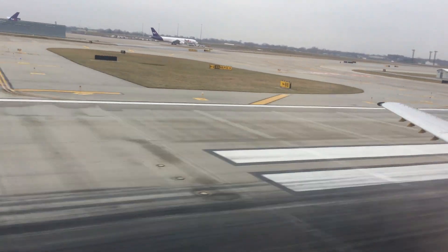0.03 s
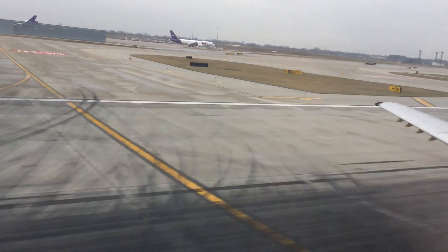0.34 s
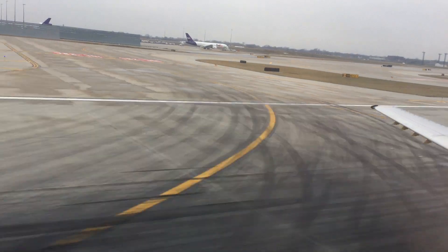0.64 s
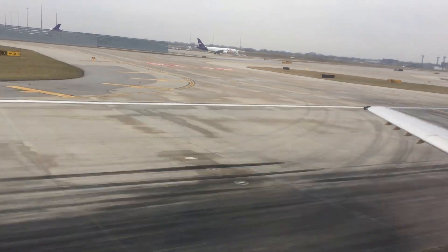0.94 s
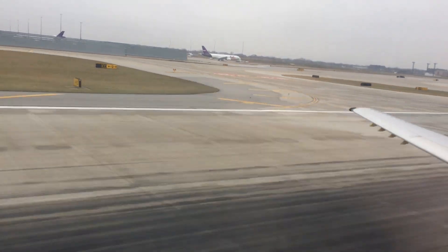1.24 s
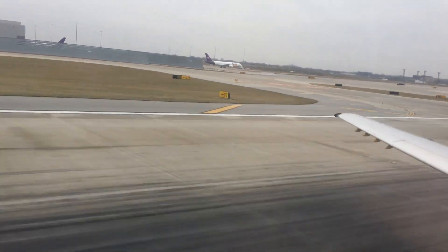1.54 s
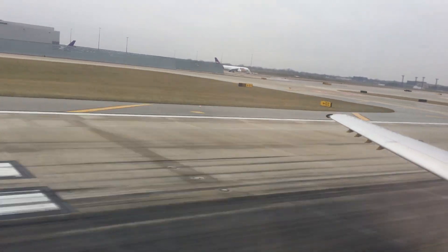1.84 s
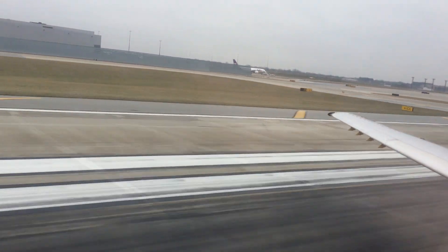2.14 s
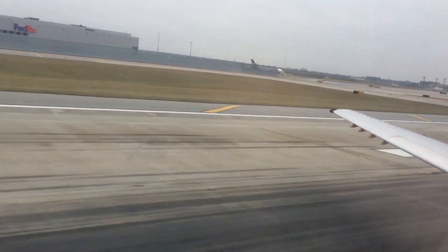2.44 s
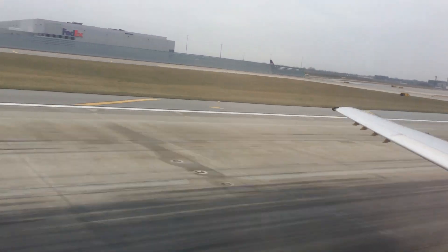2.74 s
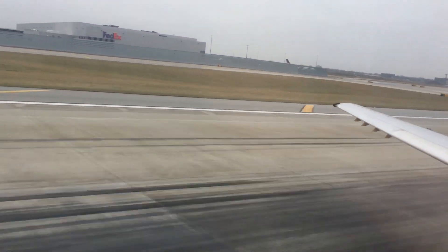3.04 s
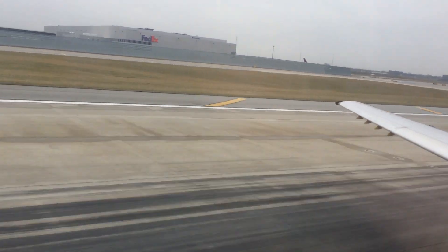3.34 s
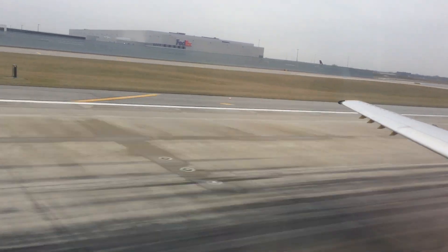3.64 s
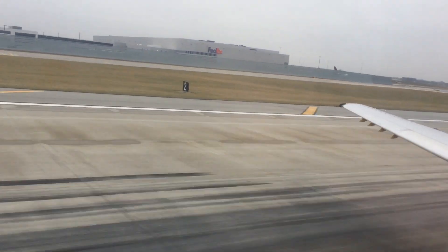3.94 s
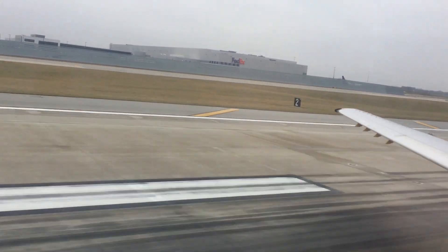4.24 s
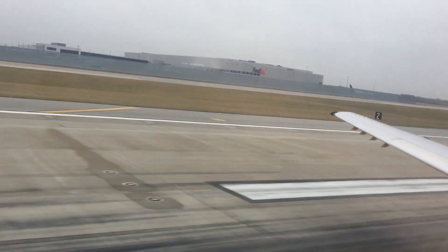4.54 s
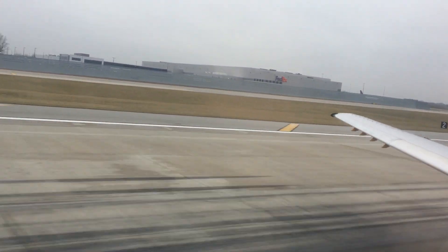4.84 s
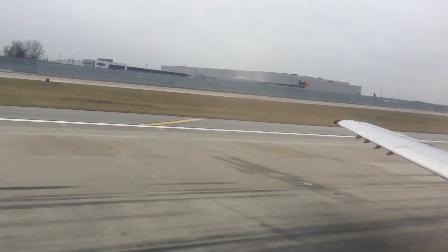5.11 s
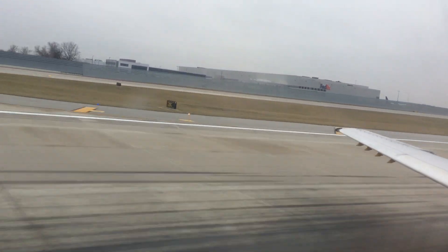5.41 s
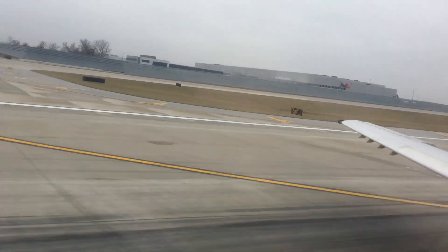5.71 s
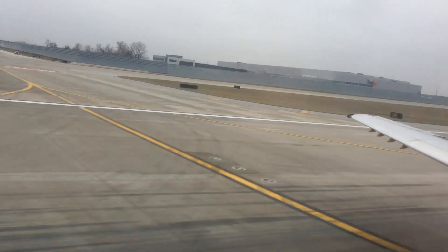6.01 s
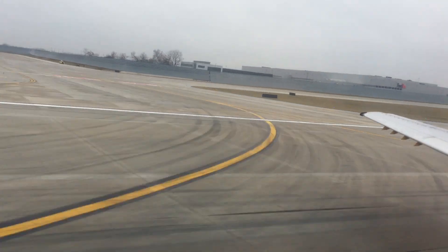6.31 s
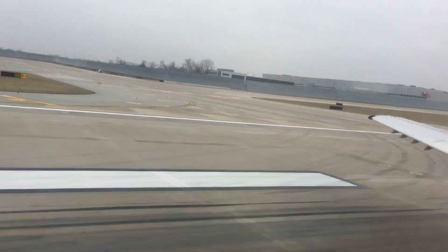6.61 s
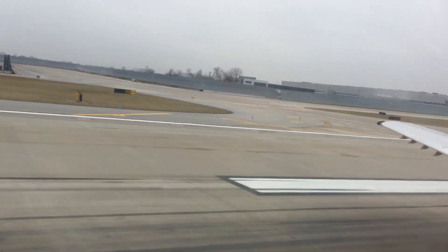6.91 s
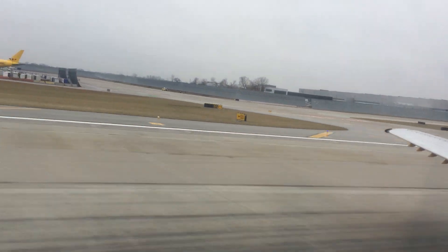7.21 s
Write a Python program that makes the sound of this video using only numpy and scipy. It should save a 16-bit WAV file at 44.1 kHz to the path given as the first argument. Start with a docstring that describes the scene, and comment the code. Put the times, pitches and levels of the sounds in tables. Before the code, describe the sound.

The sound is heard inside a small jet's cabin, opening on a low rumble, two unsteady engine hums and a dull rush of air. From about 0.8 to 1.9 seconds the wheels meet the runway in a run of deep jolts, hardest near 1.25 and 1.9 seconds. Fittings rattle, and bins and seats give plastic clacks and hollow knocks until about 1.5 seconds. A deep tyre rumble carries on with light, grainy rattling and four more bumps between 2.9 and 3.9 seconds. Further bumps come from 5.7 to 6.3 seconds, with a few knocks and renewed rattling. A faint, breathy engine whine emerges midway and sinks slightly after 5.8 seconds. Throughout, close by, a plastic trim panel gives tiny high chirps, sparse at first, then in quick repeated bouts after touchdown. Rumble and squeaks continue to the end at about 7.5 seconds.

```python
"""Landing, heard in a small jet's cabin

The wheels meet the runway with jolts that ring the airframe and set off a burst of rattling, then roll on.
Two engine hums and a faint sinking whine lie over the rumble of the tyres and the rush of air.
Close by, a plastic trim panel rubs to and fro with the shaking and chirps by stick-slip friction."""
import sys
import numpy as np
from scipy import signal
from scipy.fft import rfft, irfft, next_fast_len
from scipy.io import wavfile
from scipy.ndimage import uniform_filter1d, minimum_filter1d, map_coordinates

SR = 44100
rng = np.random.default_rng(int(sys.argv[2]) if len(sys.argv) > 2 else 0)


def materialize(psi):
    """Save the field psi as 16-bit PCM at rate SR to the path in sys.argv[1].

    A 1-D psi becomes a single channel; in a 2-D psi each row is a channel.
    """
    bounded = np.clip(np.atleast_2d(psi).T, -1, 1)
    quanta = np.round(bounded * 32767).astype(np.int16)
    wavfile.write(sys.argv[1], SR, quanta)


N = 328986
TOP_HZ = 15900  # band limit

# bumps through the landing gear: t/s, jolt level/dB, level of the rumble stirred up/dB
BUMPS = [(0.81, -4, -15.5), (1.085, -2.5, -15.5), (1.25, 0.5, -10), (1.546, -5.5, -24), (1.712, -7, -21),
         (1.867, 1.5, -11), (2.9, -9, -14.5), (3.13, -2, -20), (3.489, -4.5, -12), (3.85, -4, -12),
         (5.745, -1.5, -13.5), (6.125, -10, -15.5), (6.319, -4, -17), (6.766, -25, -9.5)]


def amp(db):
    """Decibels to amplitude ratio."""
    return 10 ** (np.asarray(db) / 20)


def unit(x):
    """Scale to rms 1."""
    return x / np.sqrt(np.mean(x ** 2) + 1e-20)


def along(points, hz):
    """Interpolate (f/Hz, value) points on a logarithmic frequency axis."""
    f, v = np.transpose(points)
    return np.interp(np.log(hz + 1), np.log(f + 1), v)


def curves(rows):
    """Interpolate each column after the time to one value per sample."""
    times, *columns = np.transpose(rows)
    return [np.interp(np.arange(N) / SR, times, column) for column in columns]


def at(curve, s):
    """Value of a curve at time s."""
    return curve[int(np.clip(s * SR, 0, N - 1))]


def wobble(rate):
    """Smooth random modulation, a spline through rate knots a second."""
    return map_coordinates(rng.standard_normal(int(N * rate / SR) + 4), [np.arange(N) * rate / SR])


def filtered(x, response):
    """Multiply the spectrum of x by a frequency response."""
    size = next_fast_len(N + SR // 2)
    return irfft(rfft(x, size) * response(np.fft.rfftfreq(size, 1 / SR)), size)[:N]


def noise(spectrum):
    """Coloured noise of rms 1."""
    return unit(filtered(rng.standard_normal(N), lambda hz: amp(along(spectrum, hz))))


def phase_of(hz):
    """Phase in radians as the time integral of frequency."""
    return 2 * np.pi * np.cumsum(hz) / SR


def add(track, s, sound):
    """Superpose a sound on the track from time s on."""
    start = max(round(s * SR), 0)
    part = track[start:start + len(sound)]
    part += sound[:len(part)]


def air(gain_db=-1):
    """Flow noise: air along the skin makes a broadband rush, dulled by the cabin lining."""
    envelope = [(0, -29), (.9, -30), (1.3, -27), (1.5, -33), (2.1, -34.5), (2.6, -32.5), (6.3, -30.5),
                (7, -33.5)]  # strength of the rush: t/s, level/dB
    spectrum = [(20, -45), (100, -4), (200, -2), (270, 0), (340, -9), (480, -14.5), (620, -10),
                (760, -17.5), (1100, -22), (2550, -36), (3000, -35), (5000, -51), (7000, -50.5),
                (11000, -64), (16000, -77)]  # rush inside the cabin: f/Hz, spectral level/dB
    level_db, = curves(envelope)
    return amp(level_db + gain_db + 0.36 * wobble(9.9)) * noise(spectrum)


def engines(hum_db=-1, overtone_db=-23, whine_db=-4):
    """Structure-borne tones: two shafts hum unsteadily; fast random modulation makes a whine breathy."""
    # lower hum, upper hum and whine: t/s, f/Hz, level/dB
    fan_track = [(0, 79.4, -23), (.7, 81, -29.5), (1.6, 82.1, -22.5), (2.4, 83.43, -23),
                 (3.05, 85.65, -14.5), (3.7, 84, -32.5), (4.3, 83.06, -14.5), (4.68, 83, -13.5),
                 (5, 82.64, -24), (5.5, 82.76, -16.5), (6.2, 80.93, -18.5), (7, 78.27, -16),
                 (7.46, 79, -20.5)]
    core_track = [(0, 175, -24.5), (2.1, 178.9, -28.5), (5.2, 183.4, -25.5), (6.2, 184.7, -26),
                  (7.46, 184.8, -30.5)]
    whine_track = [(0, 1763, -81), (3.2, 1718, -59), (4.8, 1717, -55), (5.75, 1715, -50.5),
                   (6.7, 1639, -52.5), (7.46, 1611, -53)]
    fan_hz, fan_level = curves(fan_track)
    core_hz, core_level = curves(core_track)
    whine_hz, whine_level = curves(whine_track)
    fan = amp(fan_level + hum_db + 1.23 * wobble(16))
    fan *= np.sin(phase_of(fan_hz + 0.88 * wobble(6.6)))
    core_phase = phase_of(core_hz + 0.37 * wobble(8))
    core = amp(core_level + hum_db + 0.78 * wobble(9))
    core *= np.sin(core_phase) + amp(overtone_db) * np.sin(2 * core_phase)
    whine = amp(whine_level + whine_db + 3 * wobble(60))
    whine *= np.sin(phase_of(whine_hz + 35 * wobble(160)))
    return np.sqrt(2) * (fan + core + whine)


def wheels(gain_db=-5, rise_s=0.046, fall_s=0.1, evenness=0.98, window_s=0.059):
    """Rolling noise: tyres on concrete shake the fuselage, and each bump adds a swell of power."""
    rolling = [(0, -19), (.72, -18.5), (.85, -14), (1.9, -14.5), (2.2, -16.5), (2.6, -12.5), (3.7, -19),
               (4.2, -14), (5.55, -18), (5.9, -16), (7.46, -14.5)]  # rumble between the bumps: t/s, level/dB
    spectrum = [(15, -69), (30, -35), (42, -2.5), (54, 3.5), (62, 8.5), (73, 7.5), (92, -1), (135, 0),
                (165, -8.5), (200, -15.5), (300, -41), (800, -120)]  # tyre rumble: f/Hz, spectral level/dB
    t = np.arange(N) / SR
    level_db, = curves(rolling)
    power = amp(level_db + 1.15 * wobble(7)) ** 2
    for s, _, db in BUMPS:
        power += amp(db) ** 2 * np.exp(-np.maximum((s - t) / rise_s, (t - s) / fall_s) ** 2)
    rumble = noise(spectrum)
    running_rms = np.sqrt(np.abs(uniform_filter1d(rumble ** 2, int(window_s * SR))) + 1e-6)
    return amp(gain_db) * np.sqrt(power) * unit(rumble / running_rms ** evenness)


def jolts(rise_s=0.0068, thud_db=-28, thud_t60=0.15, thud_growth=3.9):
    """Modal ringing: bumps, softened by the struts, excite the airframe; the hardest thud in the floor."""
    modes = [(60.6, -3, 0.082), (76.3, 1.5, 0.2), (114.4, -1, 0.083), (263, -23.5, 0.057),
             (342, -19.5, 0.057)]  # airframe modes: f/Hz, level/dB, T60/s
    floor = [(100, -17), (200, -8), (300, 2), (420, -6), (620, -34), (2000, -70)]  # dull thud of the floor: f/Hz, spectral level/dB
    ringing, thud = np.zeros((2, N))
    t = np.arange(SR // 3) / SR
    rise = 1 - np.exp(-(t / rise_s) ** 2)
    for s, db, _ in BUMPS:
        detunings = rng.normal(1, 0.056, len(modes))
        ring = sum(amp(level - 60 * t / t60) * np.sin(2 * np.pi * hz * detune * t)
                   for (hz, level, t60), detune in zip(modes, detunings))
        add(ringing, s, amp(db) * ring * rise)
        add(thud, s, amp(thud_db + thud_growth * db - 60 * t / thud_t60) * rise)
    return ringing + thud * noise(floor)


def shaking(threshold_db=-49, rustle_growth=0.53, rise_s=0.037, fall_s=0.077):
    """Vibration frees parts above a soft threshold. Gives fittings dB, rustle dB and the loose share."""
    vibration = [(0, -64), (.78, -57.5), (1, -45.5), (1.9, -43.5), (2.2, -48.5), (2.6, -45), (3.05, -43.5),
                 (3.38, -48), (3.85, -44.5), (4.55, -43.5), (5.1, -46), (5.35, -48), (6.25, -47.5),
                 (6.7, -43.5), (7.05, -48), (7.46, -45)]  # shaking of the cabin: t/s, fittings level/dB
    rattles = [(.83, 0.046, 10, 7.5), (1.067, .27, 6, 7.5), (2.5, 0.056, 2.5, 5), (5.895, 0.036, 4.5, 8.5),
               (6.04, 0.038, 3, 9), (6.363, .17, 5, 9), (7.413, 0.039, -0.5, 7)]  # fits of rattling: t/s, length/s, fittings boost/dB, rustle boost/dB
    t = np.arange(N) / SR
    level_db, = curves(vibration)
    rustle_db = rustle_growth * (level_db - level_db.mean())
    for s, length_s, clatter_db, bright_db in rattles:
        fit = np.clip(np.minimum(1 + (t - s) / rise_s, 1 + (s + length_s - t) / fall_s), 0, 1)
        level_db += clatter_db * fit
        rustle_db += bright_db * fit
    return level_db, rustle_db, 1 / (1 + amp(2 * (threshold_db - level_db)))


def fittings(gain_db=2):
    """Incoherent summation: countless tiny contacts blur into a grainy hiss that follows the shaking."""
    spectrum = [(100, -42), (300, -20), (700, 9), (1300, 5.5), (2050, 4), (2550, -2.5), (3000, -1.5),
                (3600, -4.5), (4500, -20), (5000, -31), (7500, -41), (16000, -74)]  # loose fittings: f/Hz, spectral level/dB
    level_db, _, loose = shaking()
    grains = unit(amp(2 * wobble(350) + 1.65 * wobble(35)))
    return loose * amp(level_db + gain_db + 1.2 * wobble(9)) * grains * noise(spectrum)


def rustle(gain_db=-58, rest_db=-72):
    """Friction noise: light things brush together in fine, bright grains as the cabin shakes."""
    spectrum = [(1000, -50), (3000, -10), (4500, 9), (6000, -1), (7100, -1), (7700, -8), (8600, 1.5),
                (9800, -6.5), (10400, -13), (12000, -5), (14000, -11), (16000, -9)]  # brushing surfaces: f/Hz, spectral level/dB
    _, stirred_db, loose = shaking()
    grains = unit(amp(1.8 * wobble(400)))
    envelope = amp(rest_db) + loose * amp(gain_db + stirred_db + 2 * wobble(14))
    return envelope * grains * noise(spectrum)


def knocks(gain_db=-6, rise_s=0.00062, clack_t60=0.031, boom_t60=0.051):
    """Impact sound: dense, damped modes make hard plastic clack and hollow parts boom a little longer."""
    impacts = [(0.809, -29, -4), (.86, -27.5, -6), (1.101, -22.5, -9), (1.145, -19, -16), (1.169, -17, -11),
               (1.222, -25, -18), (1.243, -20.5, -18), (1.318, -16.5, -4), (1.353, -16, 3.5),
               (1.362, -15, -24), (1.385, -26, 4), (1.426, -24, 2.5), (5.888, -29.5, 8.5),
               (5.918, -30.5, 10), (6.028, -24, -11)]  # bins and seats knocking: t/s, level/dB, boom relative to clack/dB
    # hard plastic and hollow body: f/Hz, spectral level/dB
    plastic = [(200, -27), (700, 5), (1400, -0.5), (2100, 2), (2700, -6.5), (3500, -2), (5400, -10.5),
               (7000, -12.5), (12000, -23.5), (16000, -28)]
    hollow = [(300, -12), (650, 0), (1100, -1.5), (2200, -9.5), (5000, -46)]
    clack, boom = np.zeros((2, N))
    t = np.arange(SR // 8) / SR
    for s, db, body_db in impacts:
        strike = amp(db + gain_db) * (1 - np.exp(-t / rise_s))
        add(clack, s, strike * amp(-60 * t / clack_t60))
        add(boom, s, strike * amp(body_db - 60 * t / boom_t60))
    return clack * noise(plastic) + boom * noise(hollow)


def stuck_db(loose, s):
    """Static friction: weak slips fade when too little shaking frees the panel."""
    share = at(loose, s)
    return 20 * np.log10(share * min(1, 2 * share))


def slips(loose, rock_hz=12.3, later_db=-3, back_lag_s=0.032, back_hz=5490, back_db=-35.5,
          strays=30, stray_hz=4430, stray_db=-36):
    """Forced rocking: the panel slips to and fro in bouts, and singly. Gives rows of t/s, level/dB, f/Hz."""
    # bouts of rocking: first stroke t/s, last stroke t/s, level/dB, opening f/Hz, later f/Hz
    bouts = [(0.502, 0.571, -36, 4520, 4610), (1.542, 1.623, -29, 4470, 4390),
             (1.805, 1.887, -28, 4550, 3620), (2.06, 2.307, -30, 4430, 4450),
             (2.389, 2.492, -27, 4500, 4640), (2.585, 2.67, -31, 3760, 3570),
             (2.766, 2.922, -29.5, 3650, 3630), (3.01, 3.23, -28.5, 3810, 3785),
             (3.265, 3.338, -32, 3530, 3796), (3.406, 3.553, -29, 4470, 3690),
             (3.585, 3.732, -29.5, 3880, 3600), (3.825, 3.981, -29, 4640, 3600),
             (4.147, 4.22, -24.5, 4510, 4180), (4.296, 4.379, -27.5, 4480, 4500),
             (4.478, 4.555, -29, 3660, 3640), (4.65, 4.88, -27, 4524, 3730),
             (4.972, 5.054, -27, 4500, 3620), (5.168, 5.202, -30.5, 4330, 3570),
             (5.271, 5.427, -28.5, 4310, 4400), (5.813, 5.994, -27.5, 4160, 4420),
             (6.171, 6.341, -29, 4530, 4550), (6.474, 6.555, -27, 4640, 4700),
             (6.625, 6.705, -26.5, 4470, 4590), (6.75, 6.819, -23, 4630, 4600),
             (6.87, 6.96, -27.5, 4690, 4540), (7.144, 7.223, -33, 4500, 4460),
             (7.367, 7.441, -28, 4550, 4490)]
    lone_slips = [(.041, -44, 10100), (.057, -30.5, 4570), (.128, -40, 4530), (.172, -34, 4570),
                  (.275, -40, 10150), (.321, -39.5, 4480), (.697, -42, 4550), (.85, -26.5, 4600),
                  (.996, -29.5, 4560), (1.038, -32, 10540), (1.073, -27.5, 4110), (1.717, -28.5, 3650),
                  (2.089, -29.5, 9860), (2.276, -34, 4470), (2.349, -32.5, 4440), (2.417, -28.5, 4570),
                  (2.614, -33, 4730), (3.128, -35.5, 3670), (3.25, -34, 9860), (3.359, -30.5, 9820),
                  (3.859, -33, 9950), (4.029, -31.5, 9870), (4.055, -29.5, 4520), (5.329, -37, 10000),
                  (5.411, -32.5, 9960), (5.712, -27.5, 4460), (6.056, -30, 10080), (6.074, -30.5, 4590),
                  (6.509, -26, 4640), (6.652, -27.5, 4630), (6.761, -33, 4900), (6.788, -30.5, 4800),
                  (7.114, -28.5, 4570), (7.309, -29, 4570), (7.331, -32, 4720)]  # single squeaks and whistles: t/s, level/dB, f/Hz
    rows = list(lone_slips)
    for first_s, last_s, db, opening_hz, later_hz in bouts:
        periods = max(1, round((last_s - first_s) * rock_hz))
        for k, s in enumerate(np.linspace(first_s, last_s, 1 + periods)):
            pitch, lag, size = rng.standard_normal(3)
            rows.append((s, db + later_db, later_hz * (1 + 0.01 * pitch)) if k else (s, db, opening_hz))
            back_s = s + back_lag_s + 0.008 * lag
            back_level = back_db + stuck_db(loose, s) + 2 * size
            rows.append((back_s, back_level, back_hz * (1 - 0.04 * abs(pitch))))
    for s in rng.uniform(0, N / SR, strays):
        size, pitch = rng.standard_normal(2)
        rows.append((s, stray_db + stuck_db(loose, s) + 3 * size, stray_hz * (1 + 0.05 * pitch)))
    return rows


def chirp(t, hz, length_s, jitter, harmonics_db=(0, -21, -23)):
    """Stick-slip oscillation: the grip catches fast and lets go slowly as the pitch bends."""
    bend = [(3600, 0.074), (4450, 0.0113), (5400, -0.0407), (10000, 0.015)]  # glide during a slip: f/Hz, bend as a share of f
    progress = t / length_s
    grip = np.exp(-np.abs(progress) ** np.where(progress < 0, 3, 1.5))
    unsteady = unit(uniform_filter1d(rng.standard_normal(len(t)), size=24))
    phase = phase_of(hz * (1 + along(bend, hz) * np.tanh(progress) + jitter * unsteady))
    tone = sum(amp(db) * np.sin(k * phase) for k, db in enumerate(harmonics_db, 1) if k * hz < TOP_HZ)
    return grip, grip * tone


def trim_panel(squeak_db=1, roughness=0.09, calm_db=-7, whistle_hz=10200, after_db=-6, before_db=-17):
    """Stick-slip friction: the panel squeaks at each slip and scrapes on rough ones, less when calm."""
    scratchiness = [(3600, 1.5), (4400, -8.5), (4650, -11), (5300, -6.5), (10000, -19)]  # roughness of a slip by pitch: f/Hz, level/dB
    durations = [(3600, 0.0018), (4450, 0.0028), (4700, 0.002), (5400, 0.0016), (10000, 0.0021)]  # time scale of a slip by pitch: f/Hz, length/s
    scrape = [(500, -67), (2500, -5), (3100, -10), (3600, 8.5), (4600, 3), (5500, -2.5), (7200, -5),
              (7900, -7.5), (9800, -10), (10400, -8), (11900, -2), (12500, -11), (15500, -35)]  # rubbing plastic: f/Hz, spectral level/dB
    tones, rubbing = np.zeros((2, N))
    t = np.arange(-SR // 50, SR // 50) / SR
    _, _, loose = shaking()
    rows = slips(loose)
    for (s, db, hz), (stretch, pitch, lead) in zip(rows, rng.standard_normal((len(rows), 3))):
        scratch = amp(along(scratchiness, hz) + calm_db * (1 - at(loose, s)) ** 2)
        length_s = along(durations, hz) * np.exp(0.14 * stretch)
        grip, tone = chirp(t, hz, length_s, roughness * scratch)
        add(tones, s + t[0], amp(db) * tone)
        add(rubbing, s + t[0], amp(db) * scratch * grip)
        if 4000 < hz < 7000:
            # a thin rising whistle follows the higher squeaks and leads into the lower ones
            lag_s, whistle_db = (0.0035, after_db) if hz > 4700 else (-0.019 + 0.0076 * lead, before_db)
            pitch_hz = whistle_hz * (1 + 0.0174 * pitch)
            _, whistle = chirp(t, pitch_hz, along(durations, whistle_hz), jitter=0.015)
            add(tones, s + t[0] + lag_s, amp(db + whistle_db) * whistle)
    return amp(squeak_db) * tones + rubbing * noise(scrape)


def cabin_echo(x, gap_s=0.003):
    """Reverberation: seats and lining leave a very short, dense echo whose treble dies first."""
    decay = [(500, 0.17), (4500, 0.048), (12000, 0.03)]  # reverberation time: f/Hz, T60/s
    hz, t, bands = signal.stft(rng.standard_normal(SR // 4), SR, nperseg=256)
    _, tail = signal.istft(bands * amp(-60 * t / along(decay, hz)[:, None]), SR, nperseg=256)
    tail = np.pad(tail / np.linalg.norm(tail), (int(gap_s * SR), 0))
    return signal.fftconvolve(x, tail)[:N]


def scene(echo_db=-10):
    """Superposition: near squeaks and knocks with their echo, over the noise of the aircraft."""
    near = trim_panel() + knocks()
    aircraft = wheels() + jolts() + engines() + air() + fittings() + rustle()
    return (near + amp(echo_db) * cabin_echo(near) + aircraft)[None]


def record(dry, ceiling=0.7):
    """Peak limiting holds down the hardest jolts; a low-pass removes all above the band limit."""
    hold = SR // 40
    needed = ceiling / np.maximum(np.abs(dry[0]), ceiling)
    gain = uniform_filter1d(minimum_filter1d(needed, hold), hold)
    return filtered(dry[0] * gain, lambda hz: hz < TOP_HZ)[None]


dry = scene()
out = record(dry)
materialize(out)
```